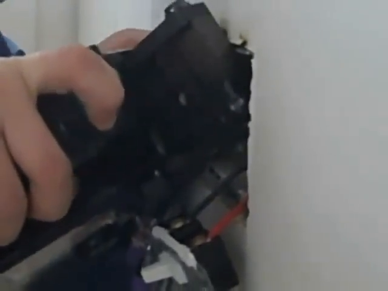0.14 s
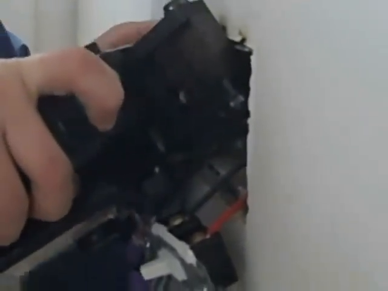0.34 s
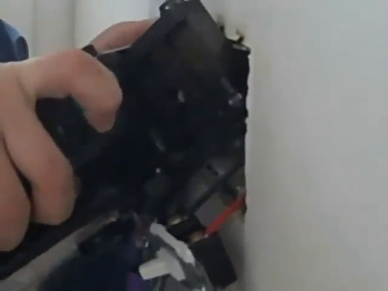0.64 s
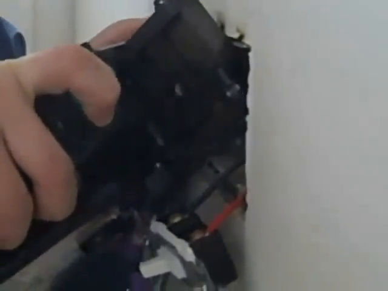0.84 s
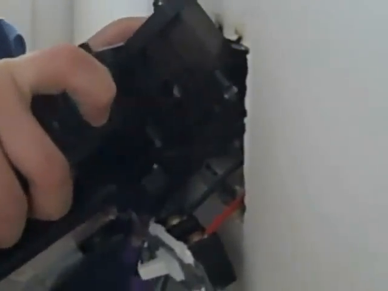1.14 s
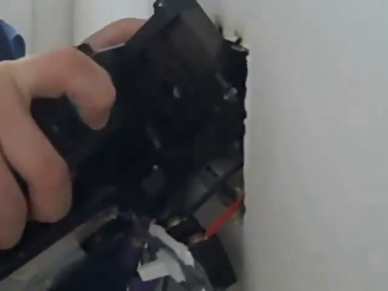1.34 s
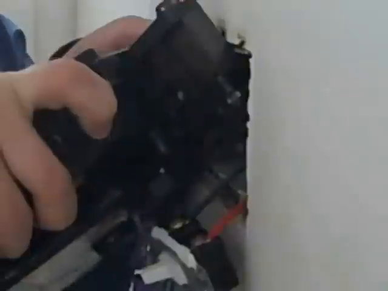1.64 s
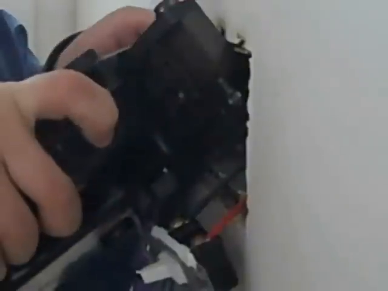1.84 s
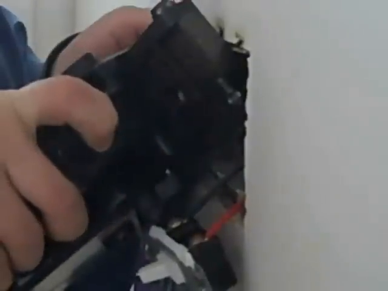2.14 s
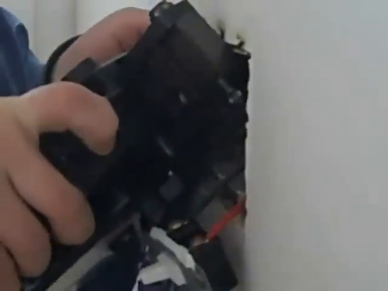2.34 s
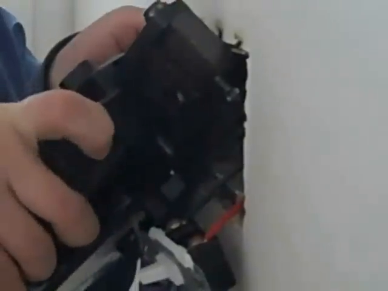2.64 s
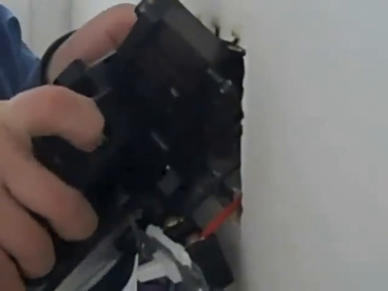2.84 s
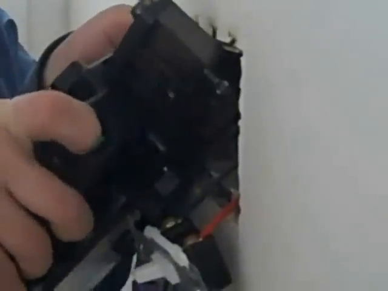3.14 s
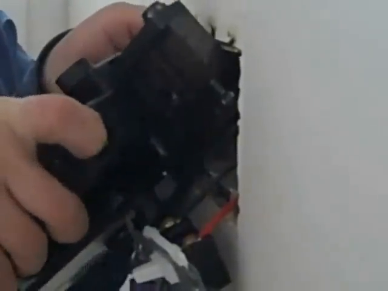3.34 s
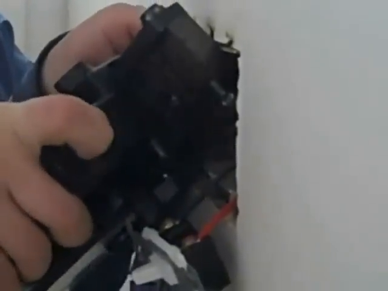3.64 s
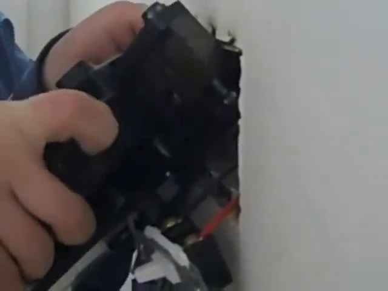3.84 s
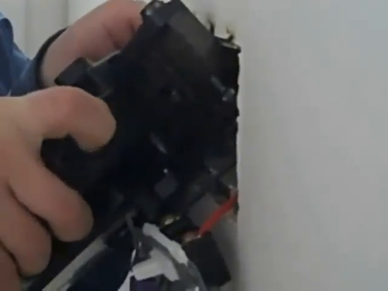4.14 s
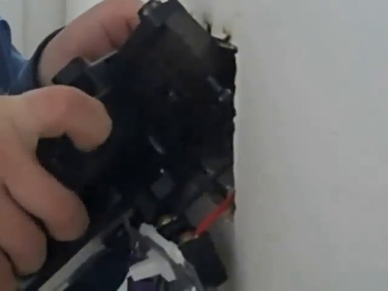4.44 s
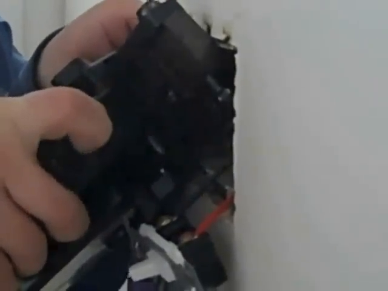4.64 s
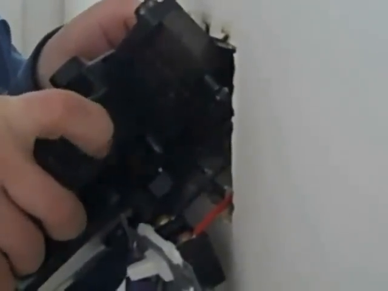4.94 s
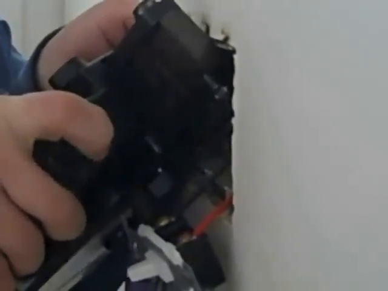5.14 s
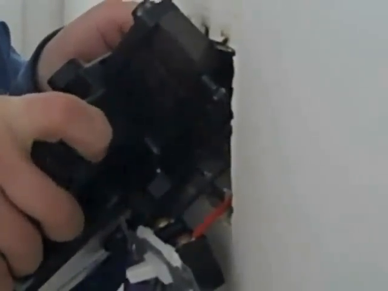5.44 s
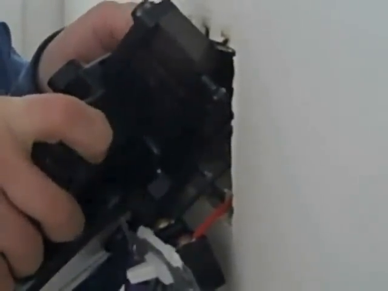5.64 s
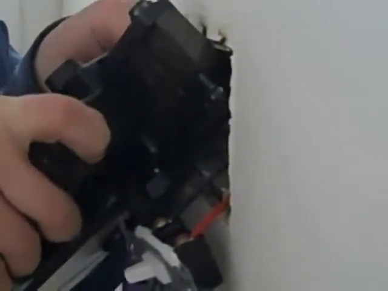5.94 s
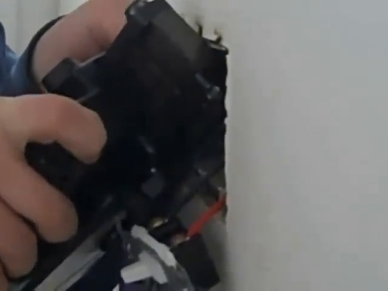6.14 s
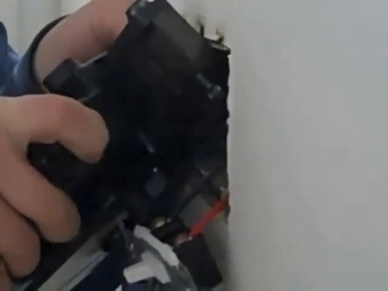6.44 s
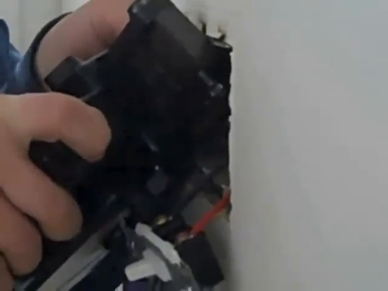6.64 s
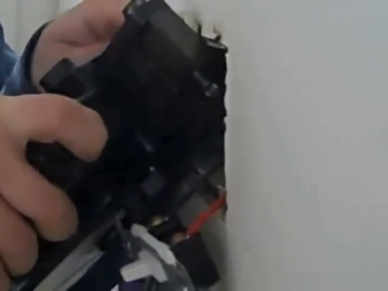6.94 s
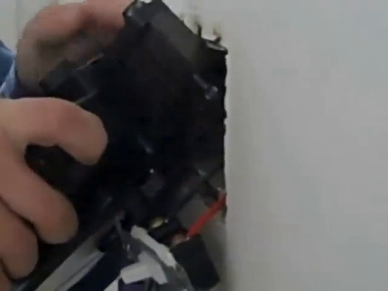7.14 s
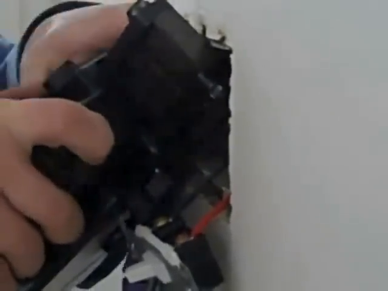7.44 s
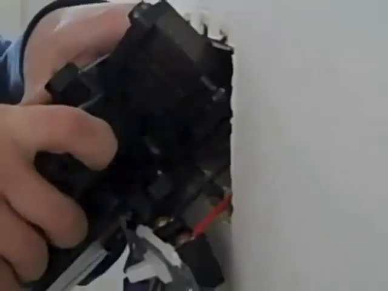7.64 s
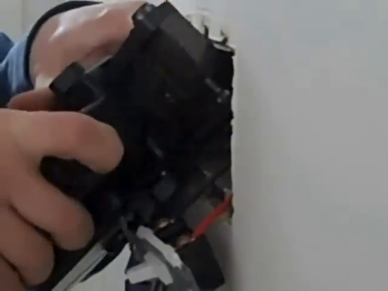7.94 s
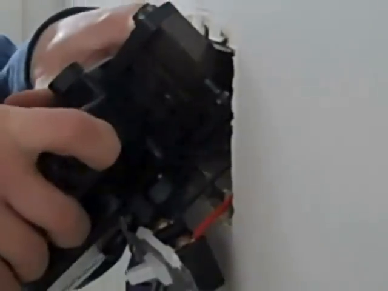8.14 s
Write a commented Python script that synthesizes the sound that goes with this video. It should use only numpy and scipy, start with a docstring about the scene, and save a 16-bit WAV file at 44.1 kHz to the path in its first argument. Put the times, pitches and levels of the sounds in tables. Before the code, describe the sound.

A cordless crimping tool bumps and snaps against a plastic box, then its geared motor whines and rattles loudly in two bursts.

```python
"""In a small room, a cordless crimping tool is settled against a plastic wall box: bumps, metal ticks,
scrapes and three sharp snaps. The trigger clicks and the geared motor spins up, then sinks in pitch
under the load of the crimp with a rough squeal. It coasts down, runs again freely with one more
squeal, and stops; a last soft bump follows. Gear whine and tooth rattle ring the same housing,
close to the left microphone."""
import sys
import numpy as np
from scipy import signal
from scipy.fft import rfft, irfft, next_fast_len
from scipy.io import wavfile
from scipy.ndimage import uniform_filter1d

SR = 44100
rng = np.random.default_rng(int(sys.argv[2]) if len(sys.argv) > 2 else 0)


def to_wav(sig):
    """Store sig (one row per channel, or 1-D mono) as 16-bit WAV at the path in sys.argv[1].

    Samples outside -1..1 are clipped; the rate is SR.
    """
    pcm = np.clip(np.atleast_2d(sig), -1, 1) * 32767
    pcm = np.round(pcm).astype(np.int16)
    wavfile.write(sys.argv[1], SR, pcm.T)  # frames by channels


N = 365588
T = np.arange(N) / SR
PADDED = 2 * next_fast_len(N // 2 + SR // 4)
FREQ = np.maximum(np.fft.rfftfreq(PADDED, 1 / SR), 1)
HIT_FREQ = np.maximum(np.fft.rfftfreq(32768, 1 / SR), 1)  # coarser axis for short hits


def amp(db):
    """Decibels to gain."""
    return 10 ** (np.asarray(db) / 20)


def unit(x):
    """Scale to rms 1."""
    return x / np.sqrt(np.mean(x ** 2) + 1e-18)


def curve(rows):
    """Automation: straight lines between (time, value) points."""
    return np.interp(T, *np.transpose(rows))


def slope(points, freq=FREQ):
    """An EQ curve in dB, joined on a log-frequency axis."""
    hz, db = np.transpose(points)
    return np.interp(np.log(freq), np.log(hz), db)


def peaks(modes, freq=FREQ):
    """Lift in dB of a set of resonances."""
    return sum(db / (1 + (2 * (freq - hz) / width) ** 2) for hz, width, db in modes)


def ring(x, db):
    """Minimum-phase EQ: resonances ring on after the sound that excites them."""
    cepstrum = irfft(db * np.log(10) / 20)
    size = len(cepstrum)
    cepstrum[1:size // 2] *= 2
    cepstrum[size // 2 + 1:] = 0
    return irfft(rfft(x, size) * np.exp(rfft(cepstrum)))[..., :x.shape[-1]]


def noise():
    """White noise."""
    return rng.standard_normal(N)


def wander(rate_hz):
    """Smooth random drift of rms 1."""
    size = max(int(SR / rate_hz), 2)
    return unit(uniform_filter1d(uniform_filter1d(noise(), size), size))


def grains(per_s, scatter_db):
    """Random tiny impacts of scattered size."""
    impulses = (rng.random(N) < per_s / SR) * np.sign(noise())
    return unit(impulses * amp(scatter_db * np.clip(noise(), -2, 2)))


def add(track, start_s, sound):
    """Place a sound on a track."""
    start = int(start_s * SR)
    track[start:start + len(sound)] += sound[:N - start]


def envelope(start_s, length_s, attack_s, release_s):
    """A straight attack, a hold and an exponential release."""
    attack = np.clip((T - start_s) / attack_s, 0, 1)
    return attack * np.exp(-np.clip((T - start_s - length_s) / release_s, 0, 20))


def swells(rows, attack_s, release_s):
    """Cues (start_s, length_s, gain_db, ...) as one gain envelope per gain column."""
    shapes = [envelope(start_s, length_s, attack_s, release_s) for start_s, length_s, *_ in rows]
    return amp(np.array(rows)[:, 2:]).T @ np.array(shapes)


def hit(peak_db, t60_s, colour, crack=6.54):
    """A first crack and a dying burst of contact chatter ring a body."""
    size = len(colour) - 1
    chatter = rng.standard_normal(size) * np.exp(-np.log(1000) * T[:size] / t60_s)
    chatter[0] = crack
    sound = ring(chatter, colour)
    return amp(peak_db) * sound / np.abs(sound).max()


# Colour of the room tone: freq_hz, gain_db
ROOM_TONE_EQ = [(15, -40.5), (25, -7.5), (85, 3.5), (229, -5), (390, -11.5), (496, -8), (942, -20.5),
                (1410, -19), (1560, -14.5), (2040, -21), (5200, -29.5), (7750, -23.5), (11000, -32),
                (13600, -34.5), (14700, -53)]


def room_tone(mid_db=-63):
    """Quiet air, alike on both sides in the bass, with microphone hiss on top."""
    mid = ring(noise(), slope(ROOM_TONE_EQ))
    side = ring(noise(), slope(ROOM_TONE_EQ) - 10 * np.log10(1 + 900 / FREQ))
    return amp(mid_db) * np.array([mid + side, mid - side]) / np.std(mid)


# Shadow over the right microphone: freq_hz, left_minus_right_db
MIC_SHADOW = [(100, 0), (600, -0.5), (1400, 4), (2800, 5.5), (5500, 7), (8000, 12), (14000, 6)]


def room(pair, near_db, near_t60_s, tail_db, tail_t60_s, lag_s):
    """Each microphone hears the direct sound, scatter from the wall close by and the room's tail."""
    channels = []
    for x, side in zip(pair, (1, -1)):
        near = unit(noise() * np.exp(-np.log(1000) * T / near_t60_s) * (T > .001))
        tail = unit(noise() * np.exp(-np.log(1000) * T / tail_t60_s) * (T > .006))
        echoes = rfft(amp(near_db) * near + amp(tail_db) * tail, PADDED) / np.sqrt(N)
        echoes *= (FREQ + 150) / (FREQ + 900)  # long waves reach both microphones alike
        balance = amp(side * slope(MIC_SHADOW))
        direct = 2 * balance / (1 + balance)
        arrival = np.exp(-1j * np.pi * FREQ * side * lag_s)
        response = direct * arrival + echoes * direct ** .5
        channels.append(irfft(rfft(x, PADDED) * response)[:N])
    return np.array(channels)


# Low body of the hand rumble and the motor thrum: freq_hz, gain_db
THRUM_EQ = [(30, -51), (60, -21.5), (110, -13), (160, -2.5), (220, 1), (300, -12), (500, -8), (1500, -56.5)]
# Tool scuffing the box: freq_hz, gain_db
SCUFF_EQ = [(24, -44.5), (40, -13), (178, 0.5), (222, -5.5), (298, 4), (329, -4.5), (608, -8), (922, -8.5),
            (1580, -18.5), (2850, -21.5), (6710, -27), (7590, -19), (14000, -74.5)]
# Shifts of grip, and one brief gritty burst trailing the snap at 2.15 s: start_s, length_s, rumble_gain_db,
# scuff_gain_db
GRIP_CUES = [(0.33, 0.034, -38.5, -63), (0.885, 0.15, -42, -65.5), (1.36, 0.11, -57, -61.5),
             (1.81, 0.21, -57.5, -66.5), (2.145, 0.0085, -78, -40.5), (2.48, 0.055, -46, -48),
             (2.695, 0.33, -50.5, -52.5), (3.07, 0.11, -38, -53.5), (3.2, 0.047, -63, -51),
             (3.29, 0.057, -32, -57), (4.17, 0.011, -51.5, -87), (4.57, 0.025, -53.5, -87),
             (7.9, 0.19, -49, -77), (8.23, 0.026, -47.5, -67)]


def handling(rest_rumble_db=-71, rest_scuff_db=-67.5):
    """The hand rumbles on the grip while the tool scuffs along the box."""
    unsteady = amp(2.5 * wander(40))
    rumble = unit(ring(noise(), slope(THRUM_EQ) - 5.8 * np.log2(FREQ / 150)))
    scuff = unit(ring(grains(per_s=1100, scatter_db=2.5), slope(SCUFF_EQ)))
    push, slide = swells(GRIP_CUES, attack_s=0.016, release_s=0.058)
    rumble *= amp(rest_rumble_db) + amp(-5.5) * push
    scuff *= amp(rest_scuff_db) + slide
    return unsteady * (rumble + scuff)


# Colour of the box's rim: freq_hz, gain_db
RIM_EQ = [(200, -15), (500, 8.5), (900, -1), (1600, -4.5), (2100, -23.5), (5000, -23), (7800, -21),
          (10000, -31), (14000, -42)]
# Drags over the rim: start_s, length_s, level_db
SCRAPE_CUES = [(1.374, 0.1, -65), (1.632, 0.12, -59.5), (2.72, 0.16, -59), (2.967, .19, -44.5),
               (3.294, 0.096, -55.5), (4.418, 0.064, -57)]


def scrapes():
    """The tool drags over the plastic rim in short runs of stick-slip grains."""
    pressure = np.zeros(N)
    for start_s, length_s, level_db in SCRAPE_CUES:
        add(pressure, start_s, amp(level_db) * signal.windows.tukey(int(length_s * SR), .4))
    return pressure * unit(ring(grains(per_s=860, scatter_db=5), slope(RIM_EQ)))


# Tool and hand bumping the box: start_s, peak_db, corner_hz, t60_s
BUMP_CUES = [(0.025, -41.5, 500, 0.082), (0.341, -34.5, 214, 0.18), (0.902, -77, 240, .2),
             (1.001, -35, 1120, 0.041), (1.028, -43, 188, 0.2), (2.498, -24, 920, 0.048),
             (2.52, -35, 796, 0.13), (2.715, -33.5, 750, 0.045), (2.744, -34.5, 746, 0.042),
             (3.258, -29, 615, 0.11), (3.307, -29.5, 300, 0.074), (4.581, -46.5, 603, 0.13),
             (8.018, -47, 218, .12)]


def bumps():
    """Soft, dull contacts move only the lows of the box."""
    track = np.zeros(N)
    low_cut = -20 * np.log10(1 + (100 / HIT_FREQ) ** 2)
    for start_s, peak_db, corner_hz, t60_s in BUMP_CUES:
        high_cut = -20 * np.log10(1 + (HIT_FREQ / corner_hz) ** 2.52)
        add(track, start_s, hit(peak_db, t60_s, low_cut + high_cut))
    return track


# Hard contact on plastic: freq_hz, gain_db
PLASTIC_EQ = [(100, -11), (700, -16.5), (1100, 0.5), (3000, 5.5), (5000, 0), (6500, -1.5), (8000, 3),
              (9200, -10), (12000, -18.5), (14000, -27)]


def contact_colour(modes, tilt_db_per_octave):
    """EQ of a hard contact: plastic, the struck part's modes and a brightness tilt."""
    octaves = np.log2(np.clip(HIT_FREQ, 500, 8000) / 3000)
    return slope(PLASTIC_EQ, HIT_FREQ) + peaks(modes, HIT_FREQ) + tilt_db_per_octave * octaves


# Small metal parts in the head: freq_hz, width_hz, lift_db
METAL_MODES = [(2444, 79, 7), (2970, 110, 15), (3780, 72, 10), (4370, 140, 11.5), (5600, 230, 5),
               (7270, 200, 9.5), (7540, 270, -6)]
# Light metal ticks: start_s, gain_db
TICK_CUES = [(0.027, -49), (0.3515, -30.5), (0.9263, -40), (1.4597, -42), (1.509, -47), (1.7143, -47),
             (1.7685, -44), (2.062, -46), (2.317, -47), (2.496, -33.5), (2.523, -36), (2.579, -39),
             (2.595, -38.5), (2.6347, -34.5), (2.674, -46), (2.736, -37.5), (2.757, -37), (2.808, -37),
             (2.8464, -46), (2.884, -48), (2.92, -42), (2.9364, -39), (3.009, -38), (3.185, -32.5),
             (3.197, -24.5), (3.2645, -32.5), (3.3186, -30), (3.3403, -37), (3.3748, -32), (3.402, -33.5),
             (3.438, -35.5), (3.45, -37.5), (3.514, -40.5), (3.6255, -48), (3.6452, -45.5), (4.032, -39.5),
             (4.655, -38)]


def ticks(trim_db=1):
    """Light taps ring the metal head; each contact point favours other modes."""
    track = np.zeros(N)
    for start_s, gain_db in TICK_CUES:
        modes = [(hz, width, lift * (.5 + rng.random())) for hz, width, lift in METAL_MODES]
        colour = contact_colour(modes, tilt_db_per_octave=7.6)
        add(track, start_s, hit(gain_db + trim_db, t60_s=0.02, colour=colour))
    return track


# Ring of the plastic box: freq_hz, width_hz, lift_db
BOX_MODES = [(1046, 61, 18), (1357, 200, 4.5), (2380, 140, 5), (3370, 100, -3), (3870, 160, 7.5),
             (4110, 64, 7), (5200, 80, 6), (7750, 230, 6.5)]
# Three sharp snaps and three faint ones: start_s, peak_db, tilt_db_per_octave, t60_s
SNAP_CUES = [(0.9999, -11, 11, 0.011), (1.854, -38, -6.5, 0.037), (2.154, -13.5, -1.5, 0.04),
             (3.1623, -5.5, -4, 0.024), (7.941, -46, -6, 0.024), (8.235, -51, -18, 0.013)]


def snaps():
    """Short cracks ring the modes of the plastic box."""
    track = np.zeros(N)
    for start_s, peak_db, tilt, t60_s in SNAP_CUES:
        add(track, start_s, hit(peak_db, t60_s, contact_colour(BOX_MODES, tilt)))
    return track


# Bright click of the switch: freq_hz, gain_db
SWITCH_EQ = [(300, -22), (1500, -17), (3300, -21.5), (4000, -4), (5200, -2), (6200, -7), (7800, 6),
             (9200, -20.5), (14000, -11)]


def trigger(start_s=4.6713):
    """The switch snaps shut as the motor starts."""
    track = np.zeros(N)
    add(track, start_s, hit(peak_db=-12, t60_s=.02, colour=slope(SWITCH_EQ, HIT_FREQ), crack=3))
    return track


# Gear tone (two rows), then squeals: start_s, length_s, first_hz, last_hz, level_db, jitter_ratio
GLIDE_CUES = [(4.91, 0.022, 930, 938, -26, 0), (4.955, 0.085, 941, 905, -28.5, 0.01),
              (5.351, 0.59, 810, 825, -32, 0.055), (6.153, 0.13, 675, 622.2, -24.5, 0.055),
              (6.781, 0.16, 660, 715.8, -24, 0.06)]


def gear_tone_and_squeals():
    """A brief gear tone as the motor reaches speed, then rough gliding squeals."""
    track = np.zeros(N)
    drift, flutter = wander(285), amp(4.6 * wander(67))
    for start_s, length_s, first_hz, last_hz, level_db, jitter in GLIDE_CUES:
        pitch_hz = curve([(start_s, first_hz), (start_s + length_s, last_hz)]) * (1 + jitter * drift)
        tone = unit(np.sin(2 * np.pi * np.cumsum(pitch_hz) / SR) * flutter)
        track += amp(level_db) * tone * envelope(start_s, length_s, attack_s=0.02, release_s=0.014)
    return track


# Ring of the tool's housing: freq_hz, width_hz, lift_db
HOUSING_MODES = [(541, 35, 2), (701.4, 17, 4.5), (1042.6, 68, 10.5), (1248, 34, -16), (1417, 80, 7),
                 (1514, 190, -10), (2215, 46, 7), (3560, 18, 12.5), (4260, 68, 3), (5270, 320, 5),
                 (5525, 99, 12), (6870, 72, 1.5), (7100, 36, 11.5), (7560, 44, 7.5), (7762, 120, 11),
                 (7930, 210, 5.5)]
# Bright colour of the gear teeth: freq_hz, gain_db
TEETH_EQ = [(400, -38), (1200, -17), (2000, -2.5), (2800, -2), (4200, -5.5), (5500, -3.5), (6600, 0),
            (7500, 1.5), (8350, 4.5), (9000, -10), (10000, -10), (11500, -30.5), (14000, -17.5)]


def tooth_rattle(turns, clacks_per_s):
    """Backlash clatter rings the housing at a flickering level."""
    clatter = backlash(turns, clacks_per_s, spread=1, clack_db=-10)
    return unit(ring(clatter, slope(TEETH_EQ) + peaks(HOUSING_MODES))) * amp(0.56 * wander(30))


def backlash(turns, clacks_per_s, spread, clack_db):
    """Teeth clatter in bunches, once a turn and at random, differently on each face of the housing."""
    bunches = amp(np.sin(2 * np.pi * turns) + 1.5 * wander(220))
    shared, left, right = (grains(per_s=1500, scatter_db=0.5) + 1.6 * noise() for _ in range(3))
    # harder clacks take up the play between the teeth
    onsets = rng.random(N) < clacks_per_s / SR
    decays = signal.lfilter([1], [1, -np.exp(-1 / (0.00064 * SR))], onsets)
    clacks = unit(decays * noise())
    return unit(shared + spread * np.array([left, right])) * bunches + amp(clack_db) * clacks


# The casing under load: freq_hz, gain_db
LOADED_EQ = [(150, -38.5), (380, -31), (520, 7.5), (750, -0.5), (1000, -6), (1400, 0.5), (1900, -5.5),
             (3000, -10.5), (6000, -23)]
# The casing with the gears running loose: freq_hz, gain_db
LOOSE_EQ = [(150, -39), (300, -10), (400, -6), (550, 7), (750, 0), (1000, -4), (1350, 2), (1850, -3),
            (2200, -34.5), (3000, -10.5), (6000, -22)]


def casing_growl(turns, clacks_per_s, crimping):
    """The teeth shake the casing into a nearly mono midrange growl."""
    shaking = backlash(turns, clacks_per_s, spread=0.037, clack_db=-9)
    housing = peaks(HOUSING_MODES)
    loaded, loose = (unit(ring(shaking, slope(eq) + housing)) for eq in (LOADED_EQ, LOOSE_EQ))
    return np.where(crimping, loaded, loose)


def mesh_tones(turns, partials):
    """Tones locked to the shaft; uneven tooth contact makes each one swell and shiver."""
    tones = np.zeros(N)
    for multiple, gain_db in partials:
        swell, shiver = amp(gain_db + 2.5 * wander(45)), .09 * wander(220)
        tones += swell * np.sin(2 * np.pi * (multiple * turns + rng.random() + shiver))
    return tones


# Body of the gear whine: shaft_multiple, gain_db
LOW_PARTIALS = [(2, -14), (3, -4), (4, 0.5), (5, 4.5), (6, -8), (10, 2.5), (11, -10)]
# Edge of the gear whine: shaft_multiple, gain_db
HIGH_PARTIALS = [(15, -5), (20, -4.5), (25, -4), (30, -1.5), (35, -2), (40, -2), (45, -7)]


def gear_whine(turns, load, bite_low, bite_high, top_hz=8460):
    """Mesh tones ring the housing and grow as load presses the teeth together."""
    housing = peaks(HOUSING_MODES)
    roll_off = -10 * np.log10(1 + (FREQ / top_hz) ** 20)  # soften the whine's highest overtones
    low = ring(mesh_tones(turns, LOW_PARTIALS), housing)
    high = ring(mesh_tones(turns, HIGH_PARTIALS), slope(TEETH_EQ) + 0.77 * housing + roll_off)
    low *= amp(-56) + amp(-30) * load + bite_low
    high *= amp(-40) + amp(-36) * load + bite_high
    return low + high


# The crimp holds the shaft back: time_s, speed_hz
LOADED_SPEED = [(4.95, 312), (5.03, 305.1), (5.1, 287.8), (5.18, 255.2), (5.27, 230.4), (5.33, 224.4),
                (5.7, 218), (5.93, 207.7), (6.0, 186.4), (6.06, 179), (6.16, 208.2)]


def shaft(on_s, off_s, crimping):
    """Speed, load (0 free, 1 stalled) and gain as the motor spins up, labours and coasts to a stop."""
    free_hz, spin_up_s, brake_hz_per_s = 389, 0.445, 930
    crimp_done_s, unload_s = 5.96, 0.064
    attack_s, soft_start_db, swell_s = 0.0057, -14.5, 0.12
    age_s = T - on_s
    spin_up = 1 - (1 - np.clip(age_s / spin_up_s, 0, 1)) ** 2
    unloaded_hz = 1 + (free_hz - 1) * spin_up
    powered_hz = np.where(crimping, np.minimum(unloaded_hz, curve(LOADED_SPEED)), unloaded_hz)
    load = (1 - powered_hz / unloaded_hz) * np.exp(-np.maximum(T - crimp_done_s, 0) / unload_s)
    coast = np.clip(1 - brake_hz_per_s * (T - off_s) / powered_hz, 0, 1)
    attack = np.clip(age_s / attack_s, 0, 1)
    swell = amp(soft_start_db * (1 - np.clip(age_s / swell_s, 0, 1)))
    return powered_hz * coast, load, attack * swell * coast ** 2.64


# The crimp, then the free return: on_s, off_s, rattle_gain_db, growl_gain_db, thrum_gain_db, clacks_per_s
MOTOR_RUNS = [(4.668, 6.28, -27, -20, -37.5, 40), (6.512, 7.55, -25, -20.5, -41, 110)]
# The gears bite hard: start_s, length_s, rattle_gain_db, growl_gain_db, low_whine_gain_db,
# high_whine_gain_db
BITE_CUES = [(4.905, 0.18, -27, -39, -40, -19), (5.105, 0.082, -24, -52, -35, -27),
             (5.23, 0.045, -35, -46.5, -34.5, -30), (5.272, 0.21, -22.5, -37, -46, -40),
             (5.5, 0.26, -22, -36, -64, -58), (5.77, 0.14, -23.5, -43.5, -36, -31),
             (5.93, 0.13, -63, -42.5, -50, -37), (6.085, 0.052, -28.5, -54.5, -35, -32),
             (6.6, 0.077, -53.5, -50, -52.5, -52), (6.735, 0.08, -26, -31.5, -35.5, -20.5),
             (6.8, 0.11, -19.5, -29, -35.5, -24.5), (7.24, 0.29, -34, -34, -62, -52)]


def motor(growl_trim_db=-8.5, growl_stall_db=-27, thrum_stall_db=-15):
    """Meshing teeth whine and rattle; the casing growls and the wall thrums, both damped by load."""
    crimp, free_return = MOTOR_RUNS
    crimping = T < free_return[0]
    settings = (np.where(crimping, first, second) for first, second in zip(crimp, free_return))
    on_s, off_s, rattle_db, growl_db, thrum_db, clacks_per_s = settings
    speed_hz, load, run_gain = shaft(on_s, off_s, crimping)
    bite_rattle, bite_growl, bite_low, bite_high = swells(BITE_CUES, attack_s=0.023, release_s=0.016)
    turns = np.cumsum(speed_hz * (1 + .0045 * wander(120))) / SR
    whine = gear_whine(turns, load, bite_low, bite_high)
    rattle = tooth_rattle(turns, clacks_per_s) * (amp(rattle_db) + bite_rattle)
    growl = casing_growl(turns, clacks_per_s, crimping)
    growl *= amp(growl_db + growl_stall_db * load) + bite_growl
    thrum = unit(ring(noise(), slope(THRUM_EQ))) * amp(thrum_db + thrum_stall_db * load)
    return run_gain * (whine + rattle + amp(growl_trim_db) * growl + thrum)


def scene():
    """The tool at the wall box, in a small room, over quiet room tone."""
    tool = motor() + gear_tone_and_squeals() + trigger()
    tool += snaps() + ticks() + bumps() + scrapes() + handling()
    in_room = room(tool, near_db=-8, near_t60_s=0.011, tail_db=-9, tail_t60_s=0.31, lag_s=.00002)
    return in_room + room_tone()


def record(dry):
    """Clip at full scale, then cut the highest treble with a steep low-pass."""
    top_hz = 14200
    low_pass = signal.ellip(10, .2, 70, top_hz, fs=SR, output="sos")
    return signal.sosfilt(low_pass, np.clip(dry, -1, 1))


dry = scene()
out = record(dry)
to_wav(out)
```